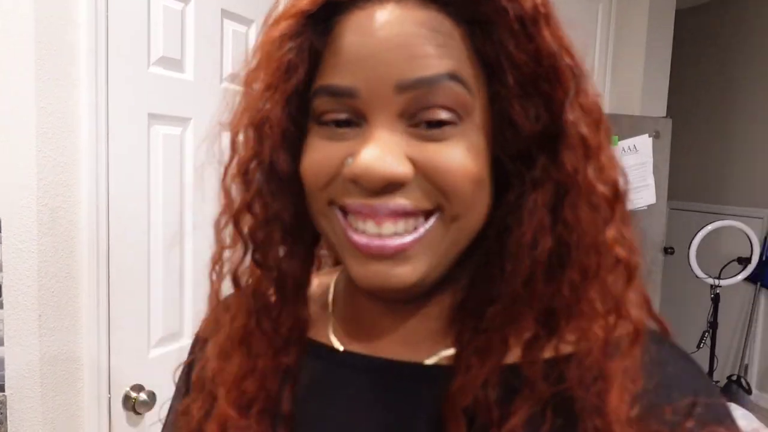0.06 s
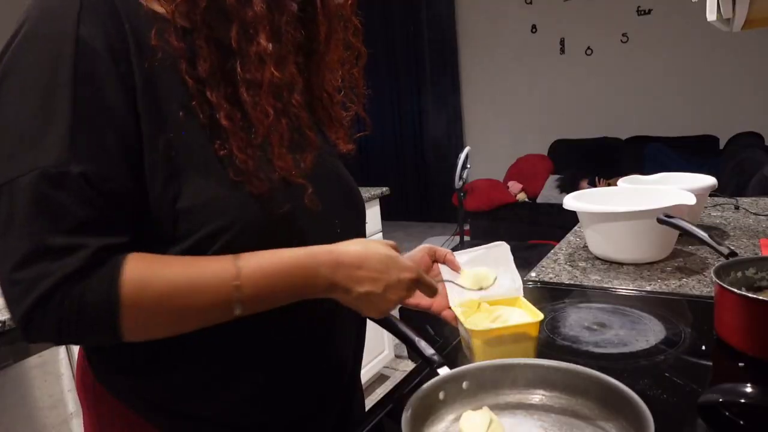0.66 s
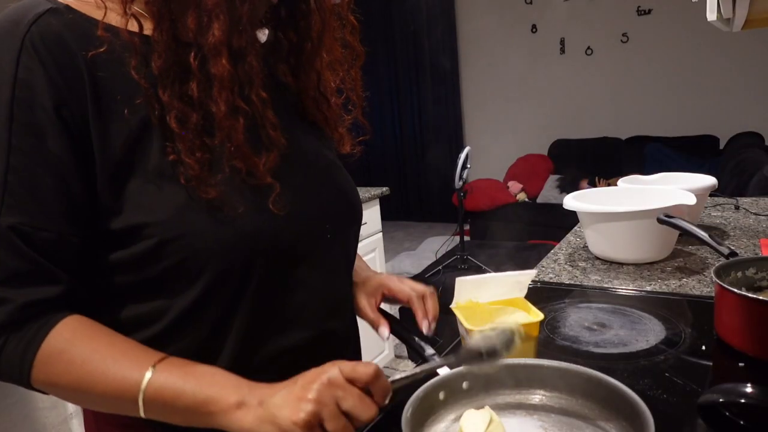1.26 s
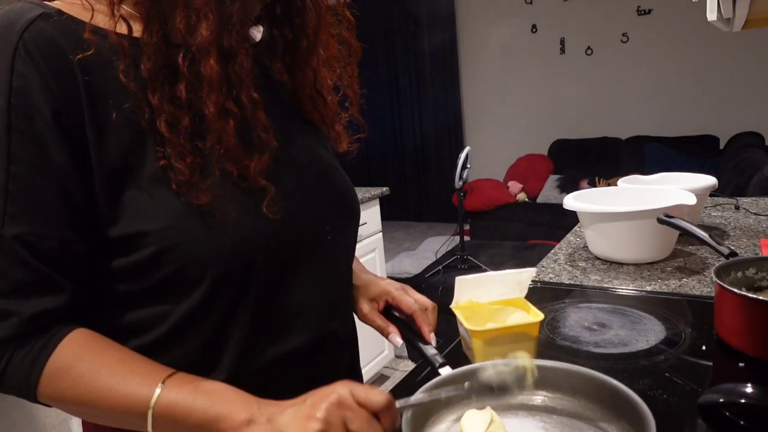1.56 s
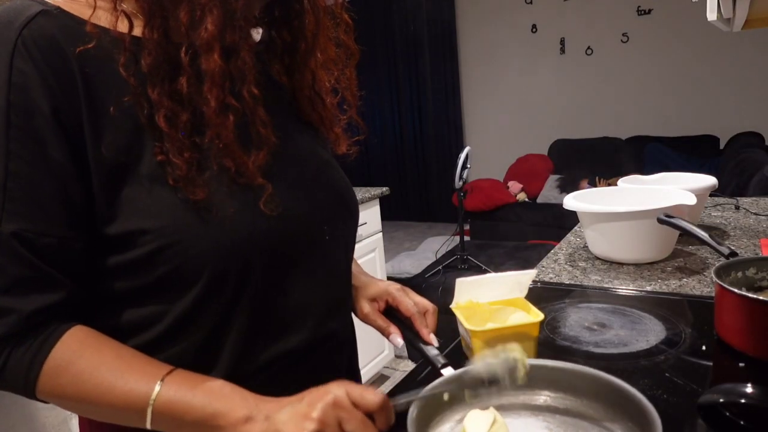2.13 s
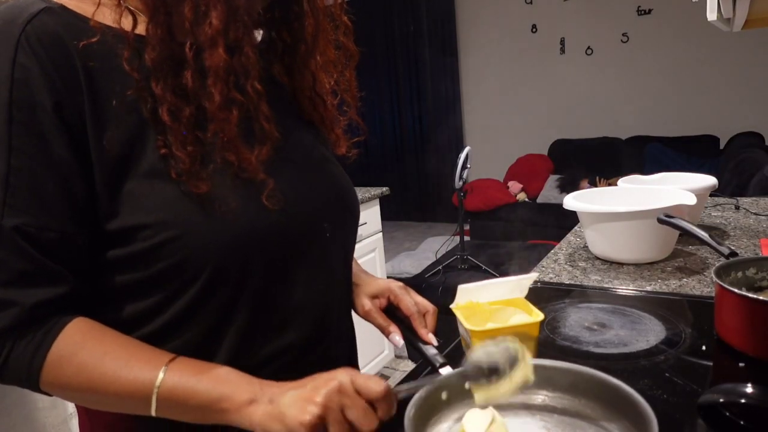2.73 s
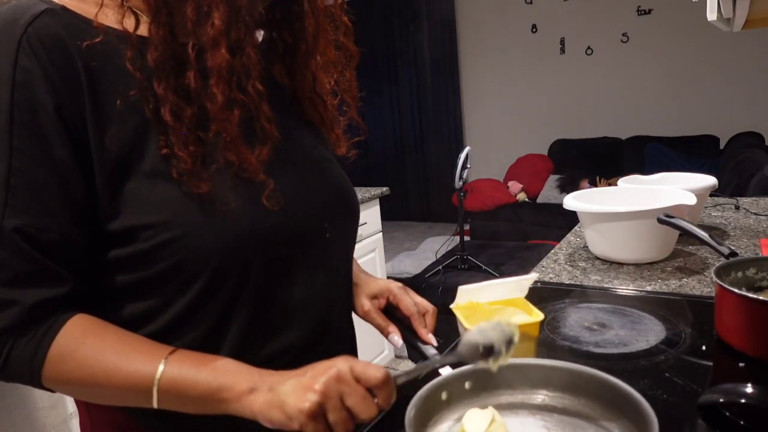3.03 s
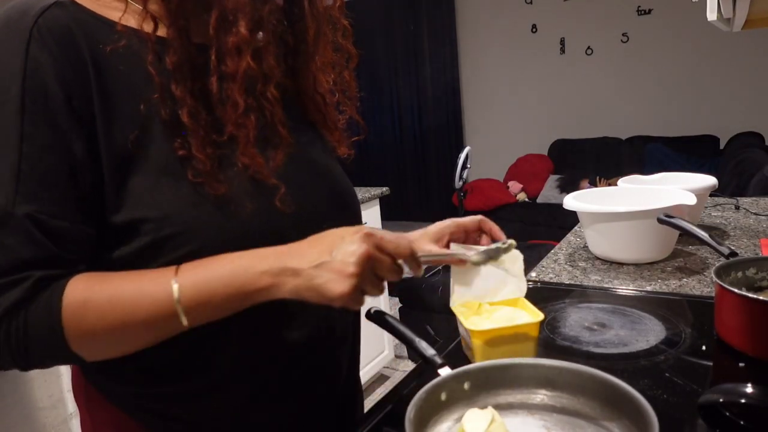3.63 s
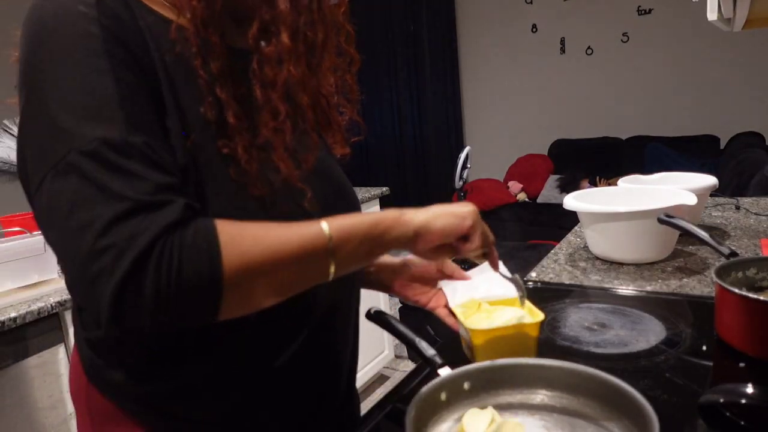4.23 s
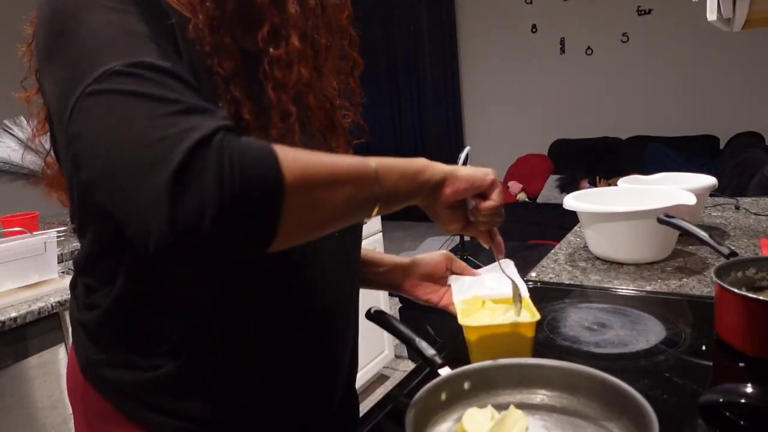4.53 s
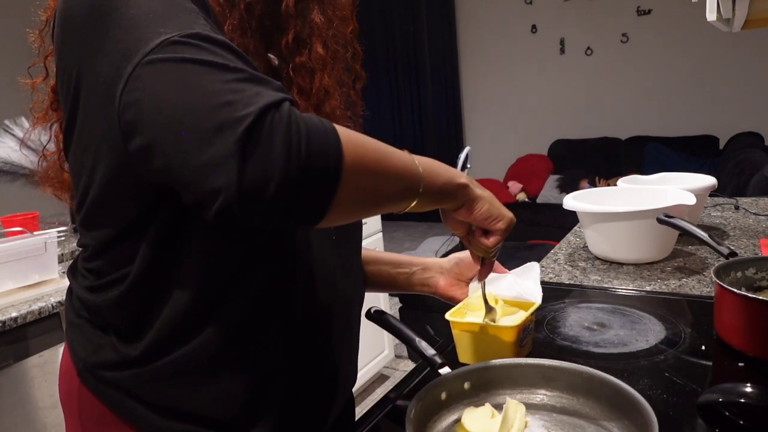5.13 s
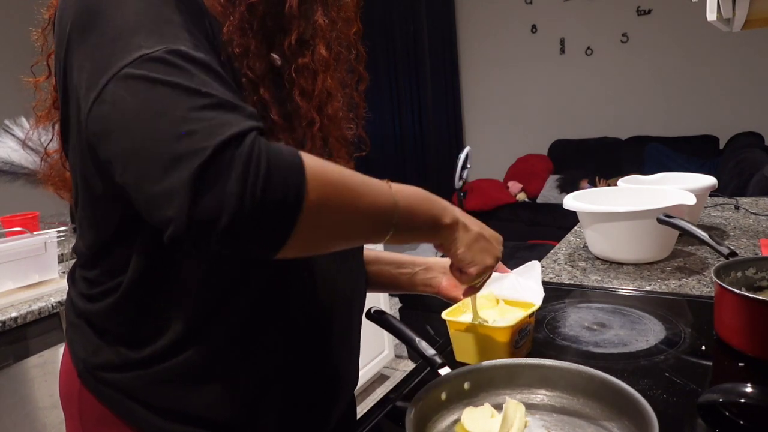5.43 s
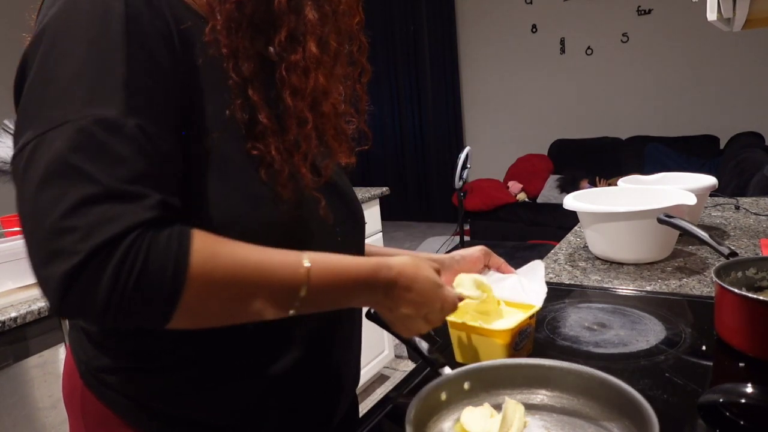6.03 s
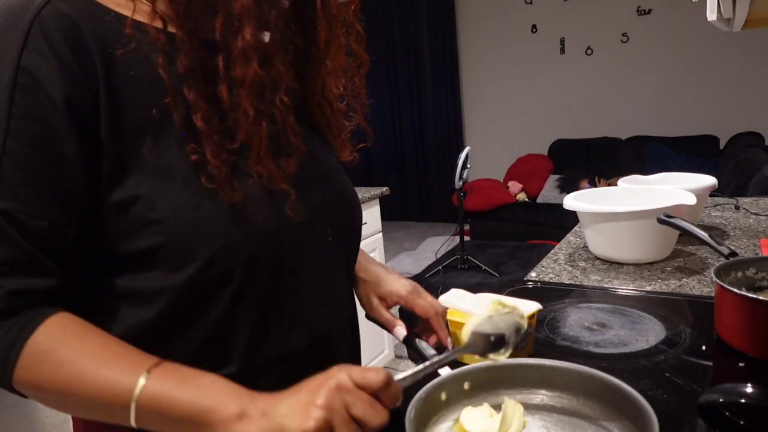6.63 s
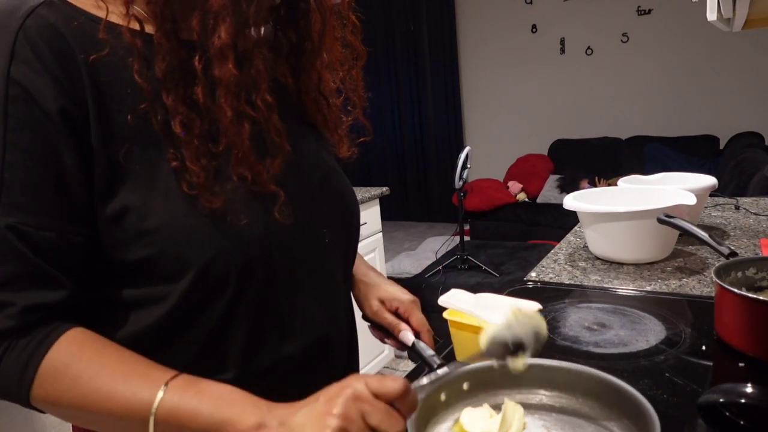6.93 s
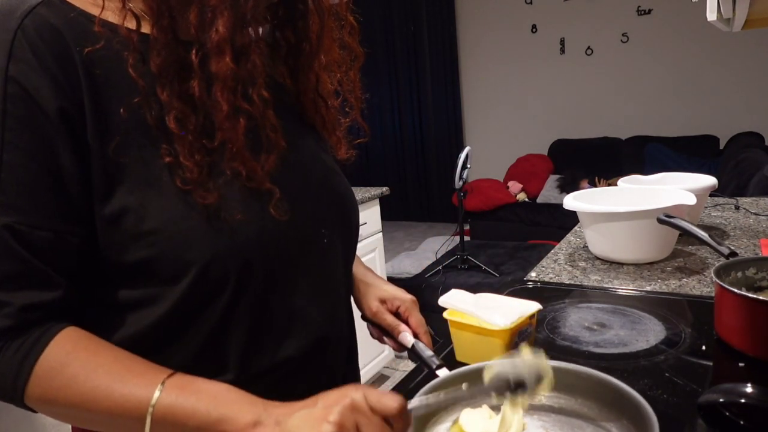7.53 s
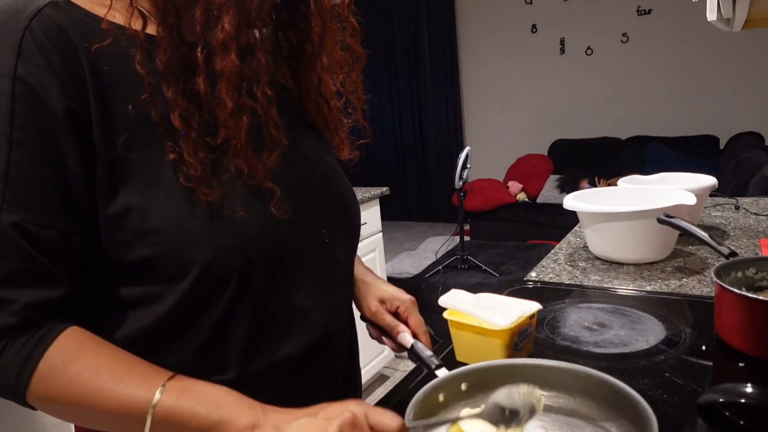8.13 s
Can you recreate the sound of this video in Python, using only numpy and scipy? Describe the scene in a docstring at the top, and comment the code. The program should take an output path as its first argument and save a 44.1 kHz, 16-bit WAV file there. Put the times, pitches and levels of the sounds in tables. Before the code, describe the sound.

A spoon clanks against a pan's rim in two runs of knocks, over the bright, steady sizzle of frying butter.

```python
"""Butter in a steel pan

A home kitchen, in stereo. After a moment of humming room tone we are at the stove, a little to the right
of the microphone, where butter sizzles in a steel pan on a glass hob. In two bouts a spoon is knocked on
the rim to shake butter off; after each knock the pan rocks and lands on the glass.
The recorder's limiter ducks the sizzle under the loudest knocks."""
import sys
import numpy as np
from scipy import signal
from scipy.fft import rfft, irfft, next_fast_len
from scipy.io import wavfile
from scipy.ndimage import uniform_filter1d, minimum_filter1d

SR = 44100
rng = np.random.default_rng(int(sys.argv[2]) if len(sys.argv) > 2 else 0)


def put_to_file(sound):
    """Save the sound as 16-bit audio at rate SR, in the file named by the first command-line argument."""
    columns = np.atleast_2d(sound).T  # one column per channel
    safe = np.clip(columns, -1, 1)
    whole_steps = np.round(safe * 32767)
    wavfile.write(sys.argv[1], SR, whole_steps.astype(np.int16))


N = 368841
TIME_S = np.arange(N) / SR
SIZZLE_START_S, CUTOFF_HZ = 0.308, 15950


def from_db(db):
    """Decibels to gain."""
    return 10 ** (np.asarray(db) / 20)


def rms_one(x):
    """Scale to rms 1."""
    return x / np.sqrt(np.mean(x ** 2) + 1e-20)


def in_time(rows):
    """Each column of a curve, at every sample."""
    times, *columns = np.transpose(rows)
    return [np.interp(TIME_S, times, column) for column in columns]


def at_hz(points, hz):
    """Read a table on a log-frequency axis."""
    freqs, values = np.transpose(points)
    return np.interp(np.log(np.maximum(hz, 1)), np.log(freqs), values)


def colour(x, db_of_hz):
    """Shape a sound's spectrum."""
    size = next_fast_len(N)
    hz = np.arange(size // 2 + 1) * SR / size
    return irfft(rfft(x, size) * from_db(db_of_hz(hz)), size)[..., :N]


def cut(x, hz, kind, order=2):
    """Butterworth filter."""
    return signal.sosfilt(signal.butter(order, hz, kind, fs=SR, output="sos"), x + 1e-18)


def drift(rate_hz):
    """A smooth random wander of spread 1."""
    step, warm_up = 40, 2000
    pole = np.exp(-2 * np.pi * rate_hz * step / SR)
    noise = rng.standard_normal(N // step + warm_up + 2)
    slow = signal.lfilter([1], [1, -2 * pole, pole * pole], noise)[warm_up:]
    return np.interp(np.arange(N) / step, np.arange(len(slow)), rms_one(slow))


def stereo_noise(width):
    """White noise, mostly shared by the two channels."""
    mid, side = rng.standard_normal((2, N))
    return rms_one(mid + width * side * np.array([[1], [-1]]))


def ring(clicks, hz, t60):
    """A unit click sets a sine of height 1 ringing."""
    decay, angle = np.exp(-np.log(1000) / (t60 * SR)), 2 * np.pi * hz / SR
    return signal.lfilter([0, np.sin(angle)], [1, -2 * decay * np.cos(angle), decay ** 2], clicks + 1e-18)


def clicks_at(times, gains):
    """One click for each event."""
    out = np.zeros(N)
    out[np.round(np.asarray(times) * SR).astype(int)] = gains
    return out


def strike(times, levels_db, modes, vary_db, chatter_s=0.0):
    """Each blow excites every mode with its own strength; a chattering contact touches twice more."""
    chance, out = rng.standard_normal((len(times), len(modes))), 0
    for k, (hz, db, t60) in enumerate(modes):
        gains = from_db(levels_db + db + vary_db * chance[:, k])
        clicks = clicks_at(times, gains)
        if chatter_s:
            for gap_s in (chatter_s / 2, chatter_s):
                delay_s = np.round(gap_s * hz) / hz   # surface meets spoon after a whole number of swings
                clicks += clicks_at(times + delay_s, gains * rng.uniform(0.6, 1, len(times)))
        out = out + (-1) ** k * ring(clicks, hz, t60)
    return out


def bursts(times, levels_db, t60):
    """Short cracks of noise that die away."""
    decay = np.exp(-np.log(1000) / (t60 * SR))
    envelope = signal.lfilter([1], [1, -decay], clicks_at(times, from_db(levels_db)) + 1e-18)
    return rng.standard_normal(N) * envelope


# The air of the room. Each row: frequency in Hz, relative density in dB.
AIR_SPECTRUM = [(29, -58), (50, -26), (121, -1), (150, -0.5), (408, -8.5), (544, -7), (987, -13.5),
                (1880, -22), (2280, -35.5), (3850, -37), (7690, -55), (9310, -60), (15000, -58)]
# An appliance in the background. Each row: frequency in Hz, rms level in dB.
HUM_PARTIALS = [(118.4, -40.5), (468.3, -50.5), (592.2, -53)]


def room_tone():
    """Dull air noise that starts louder and settles, a wavering hum and a short, faint rustle."""
    noise = colour(stereo_noise(width=0.28), lambda f: at_hz(AIR_SPECTRUM, f))
    air = from_db(-42) * rms_one(cut(cut(noise, 1400, "low", order=4), 186, "high"))
    hiss = from_db(-45.5) * rms_one(cut(noise, 2250, "high", order=4))
    settling = from_db(6 * np.exp(-TIME_S / 0.17))
    hum = sum(np.sqrt(2) * from_db(db) * np.sin(2 * np.pi * (hz * TIME_S + rng.random()))
              for hz, db in HUM_PARTIALS)
    rustle = rms_one(cut(stereo_noise(width=0.13), [5000, 10000], "band", order=3))
    rustle_db = -46.5 - 450 * np.clip(TIME_S - 0.13, 0, 1)   # holds, then falls 450 dB a second
    return (air + hiss) * settling + hum * from_db(drift(19)) + rustle * from_db(rustle_db)


# The kitchen's low noise behind the pan. Each row: time in seconds, level in dB.
RUMBLE_LEVEL = [(0.5, -80), (1.43, -71), (1.65, -49), (2.85, -46), (3.15, -56.5), (5.17, -65.5),
                (6.84, -50.5), (6.95, -44), (8.3, -51)]
# Its colour. Each row: frequency in Hz, relative density in dB.
RUMBLE_SPECTRUM = [(30, -9), (70, -20), (118, -0.5), (170, -17), (280, -2.5), (440, -4), (600, -6),
                   (1000, -7), (3000, -52)]


def rumble():
    """Soft low noise that swells around the two bouts of knocking."""
    noise = colour(stereo_noise(width=0.25), lambda f: at_hz(RUMBLE_SPECTRUM, f))
    return from_db(in_time(RUMBLE_LEVEL)[0]) * rms_one(noise)


# The room around the microphone. Each row: frequency in Hz, reverberation time (t60) in seconds.
KITCHEN_DECAY = [(100, 0.32), (400, 0.47), (1500, 0.65), (5000, 0.033), (14000, 0.025)]


def kitchen(x, wet_db, width=0.65):
    """Diffuse reflections die away octave by octave; the bass is alike in both channels."""
    t, tail = np.arange(SR) / SR, 0
    for hz in 60 * 2.0 ** np.arange(8):
        mid, side = cut(rng.standard_normal((2, SR)), [hz, 2 * hz], "band")
        apart = width * hz / (hz + 800) * np.array([[1], [-1]])
        t60 = at_hz(KITCHEN_DECAY, hz * np.sqrt(2))
        tail = tail + (mid + apart * side) * np.exp(-np.log(1000) * t / t60)
    tail = rms_one(tail * np.clip(t / 0.0056, 0, 1)) / np.sqrt(SR)
    return x + from_db(wet_db) * signal.fftconvolve(x[None], tail, axes=1)[:, :N]


# The spoon touches the butter tub. Each row: start in seconds, relative level in dB.
TUB_TOUCHES = [(1.025, -26.5), (3.622, -17.5), (3.82, -15.5), (3.85, -21), (4.638, -28), (6.437, -22)]
# The tub's modes. Each row: frequency in Hz, relative level in dB, t60 in seconds.
TUB_MODES = [(435, -15, 0.052), (840, -1, 0.037), (1060, 2, 0.023), (1380, 1.5, 0.0078), (1540, 2, 0.027)]


def butter_tub():
    """Light touches of the spoon draw faint ticks from the plastic."""
    times, db = np.transpose(TUB_TOUCHES)
    return from_db(-14) * cut(strike(times, db, TUB_MODES, vary_db=2), 250, "high")


def fizz(per_s, size_db, cycles, clump_db, hiss_db):
    """Bubbles burst in clumps and ring briefly, left to right, over a hiss of countless tiny ones."""
    out = np.zeros((2, N))
    pitches = np.geomspace(750, 15500, 28)
    for hz in pitches:
        count = int(per_s * N / SR * hz / pitches.sum())   # small bubbles are the most numerous
        starts, places = rng.integers(0, N, count), 0.95 * rng.uniform(-0.91, 1, count)
        levels_db = size_db * np.minimum(rng.exponential(1, count), 3.3) + clump_db * drift(31)[starts]
        gains = from_db(levels_db) * rng.choice([-1, 1], count)
        clicks = np.array([np.bincount(starts, gains * (1 + side * places), N) for side in (1, -1)])
        out += np.sqrt(hz) * rms_one(np.diff(ring(clicks, hz, t60=cycles / hz), prepend=0))
    return rms_one(rms_one(out) + from_db(hiss_db) * stereo_noise(width=0.055))


def near_echoes(x, strength, count=10):
    """The pan's wall, the hob and the worktop return the sizzle within a few milliseconds."""
    lags = (rng.uniform(0.002, 0.012, count) * SR).astype(int)
    return x + strength * sum(np.roll(x, lag, axis=1) * rng.choice([-1, 1]) for lag in lags)


def moving_resonance(x, hz, width_hz, block=256):
    """A band-pass of gain 1 whose centre glides."""
    radius, out, state = np.exp(-np.pi * width_hz / SR), np.zeros_like(x), np.zeros((2, 2))
    zeros = (1 - radius ** 2) / 2 * np.array([1, 0, -1])
    for i in range(0, N, block):
        poles = [1, -2 * radius * np.cos(2 * np.pi * hz[i] / SR), radius ** 2]
        out[:, i:i + block], state = signal.lfilter(zeros, poles, x[:, i:i + block], zi=state)
    return out


# The sizzle's broad colour. Each row: frequency in Hz, gain in dB.
SIZZLE_COLOUR = [(50, -55), (120, -28), (260, -29), (600, -36), (780, -15), (1050, -17), (1350, -17.5),
                 (2100, -12), (3800, 0.5), (5400, 1.5), (8300, 1.5), (9800, -2.5), (13000, -1), (16000, -2)]
# Resonances and notches of pan and hob. Each row: centre in Hz, width in Hz, gain in dB.
PAN_RESONANCES = [(1006, 34, 6.5), (1895, 136, 8), (2980, 110, 6), (3740, 72, 2), (4960, 75, 3.5),
                  (6700, 160, -3), (7540, 90, 5.5), (9050, 440, -1), (11650, 550, 4), (11700, 280, -10)]


def pan_colour_db(f):
    """Pan and hob colour the sizzle on its way to the microphone."""
    peaks_db = sum(db / (1 + (2 * (f - hz) / width) ** 2) for hz, width, db in PAN_RESONANCES)
    return at_hz(SIZZLE_COLOUR, f) + peaks_db


# Two resonances that shift as the cook moves. Each row: time in seconds, centre in Hz, strength as a gain.
LOWER_RESONANCE = [(1.15, 4220, 0.6), (1.45, 2480, 0.5), (3.8, 2100, 0.07), (4.3, 2680, 0.86),
                   (4.65, 3230, 0.72), (5.0, 3960, 0.51), (5.5, 3900, 0.39), (6.6, 3700, 0.23),
                   (7.0, 3920, 0.084)]
UPPER_RESONANCE = [(0.33, 6480, 0.36), (3.1, 6040, 0.41), (3.8, 5130, 0.058), (4.3, 5060, 0.63),
                   (5.0, 5360, 1), (5.6, 5400, 0.11), (8.3, 5040, 0.072)]


def foaming_butter():
    """The fizz surges as the butter foams, and is heard through the pan's echoes and resonances."""
    foam = fizz(per_s=9000, size_db=3, cycles=16, clump_db=2.1, hiss_db=-0.5)
    foam = foam * from_db(0.85 * drift(8.4) + 0.16 * drift(95))
    foam = colour(near_echoes(foam, strength=0.068), pan_colour_db)
    glides = map(in_time, (LOWER_RESONANCE, UPPER_RESONANCE))
    return foam + sum(strength * moving_resonance(foam, hz, width_hz=280) for hz, strength in glides)


# The upper edges in Hz of the bands of large, medium and small bubbles.
BUBBLE_EDGES_HZ = [2700, 5800, 9200]
# Those three bands. Each row: level once melted in dB, change while the butter is firm in dB,
# share of the vigour's swing, stereo width as a factor.
BUBBLE_BANDS = [(-34, -9, .8, 0.57), (-25, -5, 0.61, 0.78), (-24.5, -2, 0.58, 0.89)]
# How hard the butter fries. Each row: time in seconds, relative level in dB.
VIGOUR = [(0.5, -22), (0.69, -22.5), (2.32, -19.5), (2.47, -24.5), (2.97, -20), (3.21, -19.5), (3.8, -21),
          (4.39, -18.5), (4.86, -23), (5.47, -25), (5.91, -20), (6.54, -20.5), (6.71, -20.5), (8.3, -21)]
# The finest fizz, above those bands. Each row: time in seconds, level in dB.
FINE_FIZZ_LEVEL = [(0.35, -23), (1.3, -23), (2.3, -25.5), (3.0, -25.5), (3.9, -26.0), (4.6, -23.5),
                   (5.7, -25), (7.0, -24.5), (8.3, -24.5)]
# Single spits of fat. Each row: start in seconds, relative level in dB.
SPITS = [(0.7344, -20), (0.8224, -20), (3.7294, -17), (4.1494, -17), (5.1344, -27), (6.005, -17),
         (6.3894, -18)]


def sizzle(melt_s=1.98):
    """Butter fries, close and dry: as it melts, larger bubbles join in, and now and then the fat spits."""
    foam = foaming_butter()
    edges = [0, *BUBBLE_EDGES_HZ, CUTOFF_HZ]
    *bands, finest = [colour(foam, lambda f: np.where((f >= low) & (f < high), 0, -200))
                      for low, high in zip(edges, edges[1:])]
    vigour_db = in_time(VIGOUR)[0]
    firmness = np.exp(-(TIME_S - SIZZLE_START_S) / melt_s)
    out = rms_one(finest) * from_db(in_time(FINE_FIZZ_LEVEL)[0])
    for band, (melted_db, firm_db, share, width) in zip(bands, BUBBLE_BANDS):
        mid = band.mean(axis=0)
        level_db = melted_db + firm_db * firmness + share * (vigour_db - vigour_db.mean())
        out = out + rms_one(mid + width * (band - mid)) * from_db(level_db)
    spit_times, spit_db = np.transpose(SPITS)
    return out + cut(bursts(spit_times, spit_db, t60=0.17), [3500, 11000], "band")


# The pan rocks on the hob. Each row: landing in seconds, weight in dB, share of it that lands at once,
# seconds until the far edge comes down.
ROCKS = [(1.466, -4.5, 0.48, .023), (1.759, -1, 0.42, 0.039), (2.037, 2, 0.33, 0.029),
         (2.328, 2, 0.97, .026), (2.612, -0.5, 0.86, .025), (2.886, 3, 0.86, 0.029), (6.821, 2, .68, 0.033),
         (6.905, 0.5, 0.56, .024), (7.128, 3.5, 0.83, 0.025), (7.426, 5, .86, 0.038),
         (7.737, 0.5, .66, 0.038), (8.087, 3.5, .8, .035)]


def hob_contacts():
    """Each rock touches the hob three times. Gives times in seconds, clacks in dB and thuds in dB."""
    rows = []
    for start, weight_db, share, edge_s in ROCKS:
        first_db, rest_db = weight_db + 20 * np.log10([share, 1 - share])
        rows += [(start, weight_db - 10, first_db),   # lands
                 (start + edge_s / 2, rest_db - 13, rest_db - 3.5),   # settles
                 (start + edge_s, -7, rest_db)]   # the far edge comes down
    return np.transpose(rows)


# Modes of the pan's base and the glass hob. Each row: frequency in Hz, relative level in dB, t60 in seconds.
BASE_MODES = [(637, -18.5, 0.05), (752, -9.5, 0.047), (918, 2.5, 0.0055), (1028, -3.5, 0.022),
              (1215, -20.5, 0.072), (1510, -14.5, 0.032), (1910, -17, 0.063), (2370, -6, 0.012),
              (3870, 4, 0.0018), (4910, -11, 0.021)]
HOB_MODES = [(100, -8.5, 0.034), (117, -9.5, 0.071), (172.6, -16.5, 0.1), (228.3, -15.5, 0.071),
             (254.5, -4.5, 0.025), (294, -6, 0.024), (368, -17.5, 0.059), (459, -29, 0.13)]


def rocking_pan():
    """The base clacks and rattles on the glass; its weight, a softer push, sets the hob booming."""
    times, clack_db, thud_db = hob_contacts()
    clack = strike(times, clack_db, BASE_MODES, vary_db=2)
    crack = cut(bursts(times, clack_db - 1, t60=0.013), [1500, 10000], "band", order=1)
    rattle = cut(bursts(times, clack_db + 2, t60=0.038), [720, 1120], "band")
    thud = cut(strike(times, thud_db, HOB_MODES, vary_db=2.5), 330, "low")
    return cut(clack + crack + rattle, 350, "high") + cut(thud, 90.6, "high", order=6)


# The spoon on the rim, in the foreground. Each row: start in seconds, level in dB,
# lasting ring in dB against that level, pitch of the clang as a ratio.
KNOCKS = [(1.413, -9, 1, 1.02), (1.719, -8, 0, 0.97), (1.9974, -2, 0, 1), (2.2806, -1, 2.5, 1.01),
          (2.5649, -3.5, 5, 0.96), (2.8423, -1.5, 2.5, 0.96), (6.773, 0.5, 3.5, 0.97),
          (7.0855, 3.5, 0, .98), (7.3912, 2, 0.5, .97), (7.7099, 1.5, 4, .93), (8.0621, 1, -1.5, 0.83)]
# The rim's modes. Each row: frequency in Hz, relative level in dB, t60 in seconds.
RIM_MODES = [(176, -35, 0.12), (444, -27, 0.012), (702, -36, 0.18), (760, -19, 0.0067), (1180, -29, 0.079),
             (1680, -19, 0.018), (1927, -20, .045), (2152, -0.5, 0.0085), (2195, -22, 0.068),
             (2350, -17, 0.045), (2520, -2, 0.0091), (2850, -24, 0.02)]
# The jolted pan's buzz. Each row: low and high edge in Hz, level against the knock in dB, t60 in seconds.
BUZZ_BANDS = [(147, 830, -8, 0.25), (720, 1700, -7.5, 0.3), (1650, 4200, -7, 0.12)]


def spoon_knocks(lasting_s=0.045, chatter_s=0.0018):
    """Steel on steel: a hard clang topped by a bright tick, while the jolted pan buzzes on the glass."""
    times, db, ring_db, _ = np.transpose(KNOCKS)
    clang = 0
    for start, knock_db, _, pitch in KNOCKS:   # the pitch depends on where the spoon hits
        short_modes = [(hz * pitch, level, t60) for hz, level, t60 in RIM_MODES if t60 < lasting_s]
        clang = clang + strike([start], knock_db, short_modes, vary_db=2, chatter_s=chatter_s)
    # a loose grip lets it ring on
    long_modes = [(hz, level, t60) for hz, level, t60 in RIM_MODES if t60 >= lasting_s]
    ringing = strike(times, db + ring_db, long_modes, vary_db=2.5, chatter_s=chatter_s)
    buzz = sum(cut(bursts(times + 0.003, db + band_db, t60), [low, high], "band")
               for low, high, band_db, t60 in BUZZ_BANDS)
    tick = cut(bursts(times, db - 5, t60=0.048), [4000, 14000], "band")
    return cut(clang + ringing, 80, "high") + buzz + tick


# The balance at the microphone. Each row: frequency in Hz, left minus right in dB.
MIC_BALANCE = [(130, 0), (290, .3), (640, -1.1), (1410, -1.7), (3100, -1.4), (6820, -4.3), (15000, -2.2)]


def scene():
    """Room tone gives way at once to the stove, which stands a little to the right."""
    knocks = kitchen(spoon_knocks(), wet_db=-15)
    clatter = kitchen(rocking_pan() + butter_tub(), wet_db=-11.5)
    shift_db = -0.7 + 0.12 * TIME_S   # left minus right: the sizzle creeps towards the middle
    frying = sizzle() * from_db([shift_db / 2, -shift_db / 2])
    left, right = knocks + clatter + frying + rumble()
    stove = np.array([colour(left, lambda f: at_hz(MIC_BALANCE, f) / 2),
                      colour(right, lambda f: -at_hz(MIC_BALANCE, f) / 2)])
    return np.where(TIME_S < SIZZLE_START_S, room_tone(), stove)


def limiter(x, ceiling_db, hold_s, release_s):
    """Peaks over the ceiling pull the gain down at once; it holds, then recovers, quickly at first."""
    over_db = np.maximum(20 * np.log10(np.abs(x).max(axis=0) + 1e-9) - ceiling_db, 1e-6)
    fall = TIME_S / release_s
    gain_db = -np.exp(np.maximum.accumulate(np.log(over_db) + fall) - fall)
    hold = int(hold_s * SR)
    held_db = minimum_filter1d(gain_db, size=hold, origin=(hold - 1) // 2)
    smooth_db = uniform_filter1d(minimum_filter1d(held_db, size=31), size=31)
    return x * from_db(smooth_db)


def record(dry):
    """The recorder rounds the peaks, limits them, then cuts the top."""
    rounded = 2.2 * np.tanh(dry / 2.2)
    limited = limiter(rounded, ceiling_db=-3.4, hold_s=0.012, release_s=0.036)
    return signal.sosfilt(signal.ellip(12, 0.1, 90, CUTOFF_HZ, fs=SR, output="sos"), limited)


dry = scene()
out = record(dry)
put_to_file(out)
```